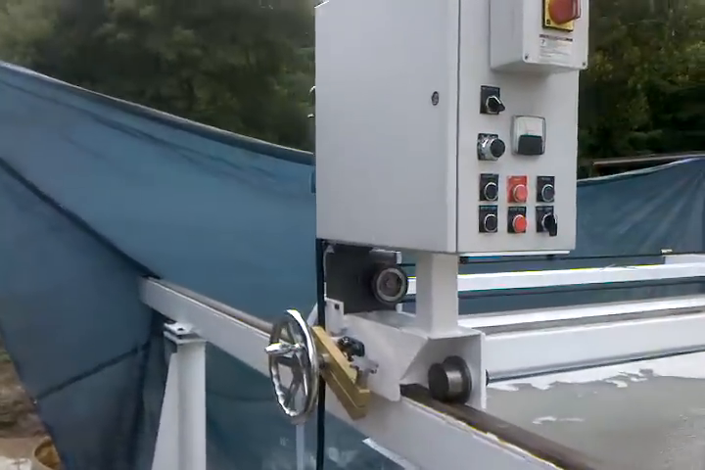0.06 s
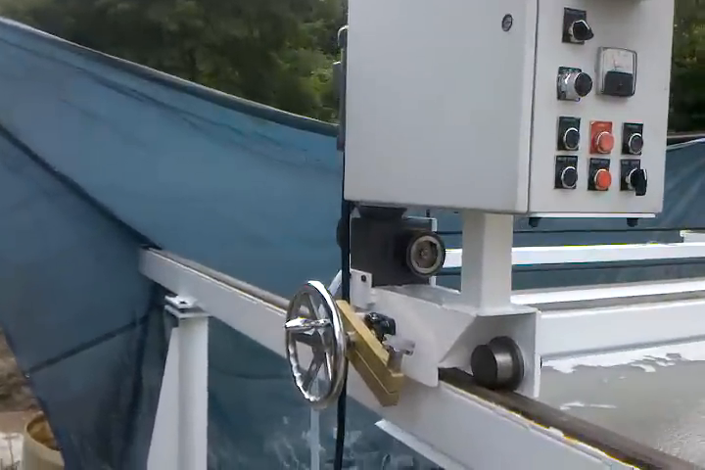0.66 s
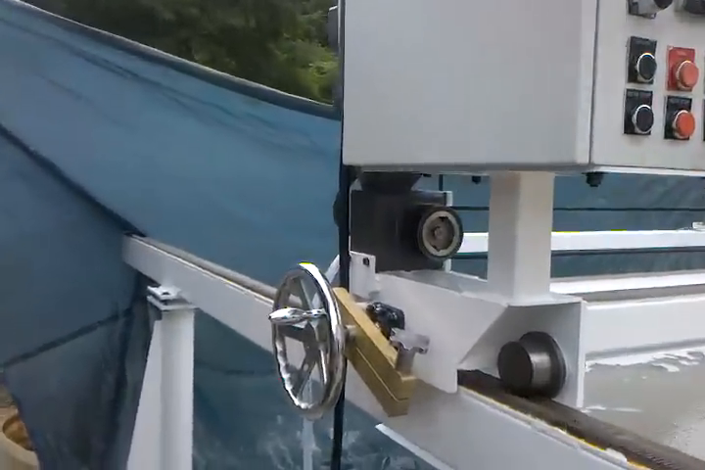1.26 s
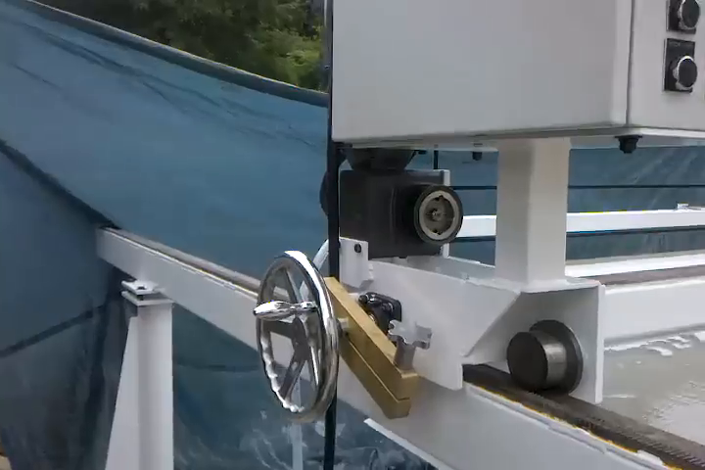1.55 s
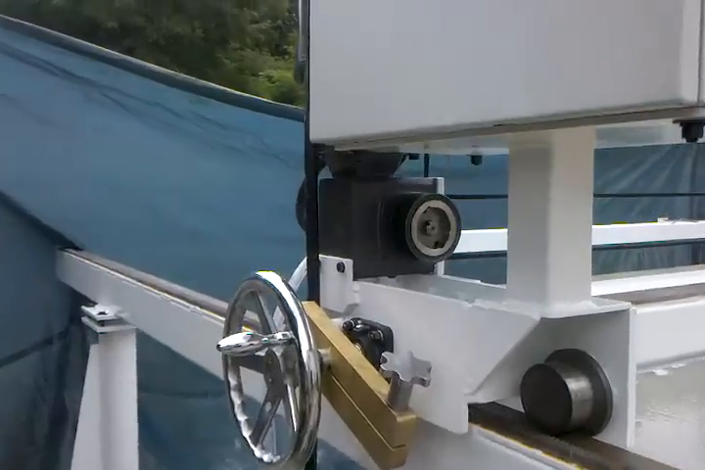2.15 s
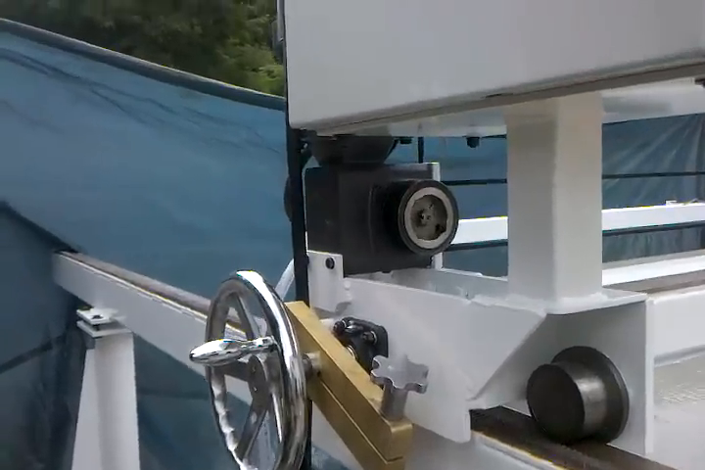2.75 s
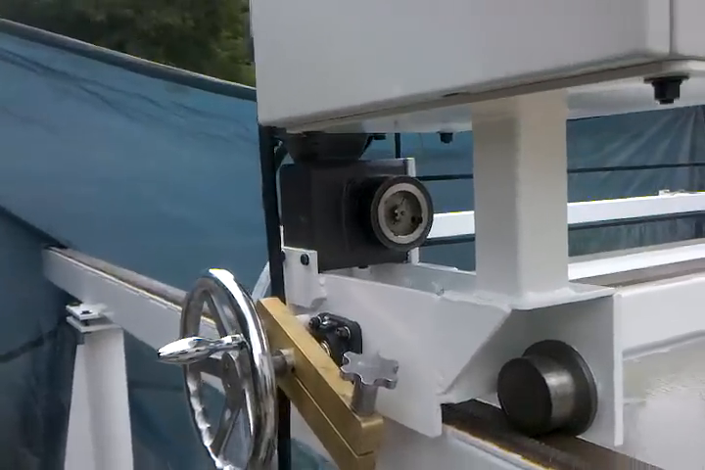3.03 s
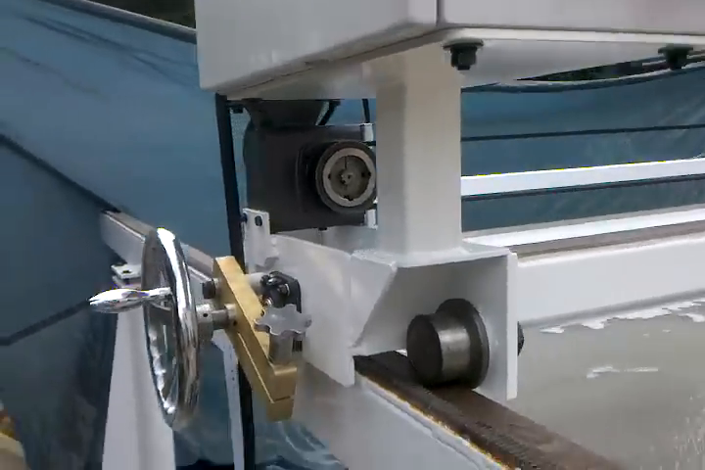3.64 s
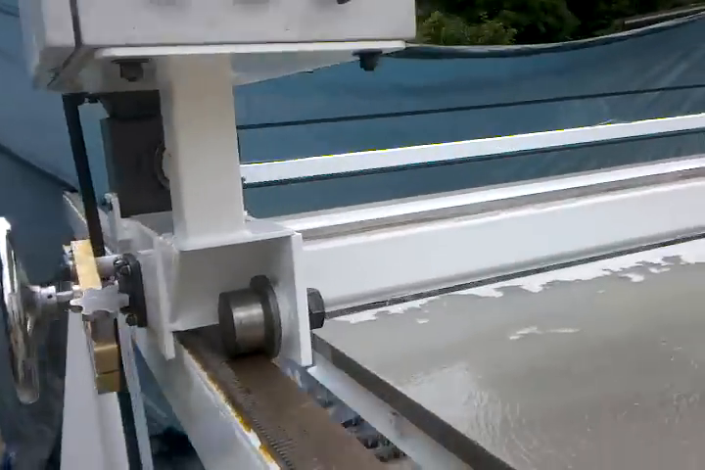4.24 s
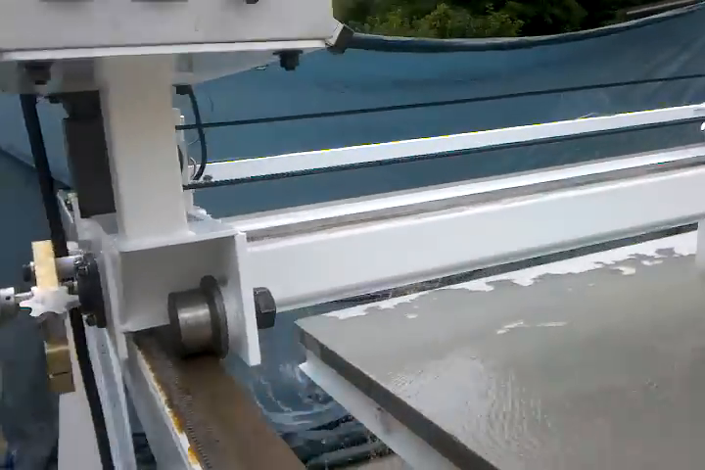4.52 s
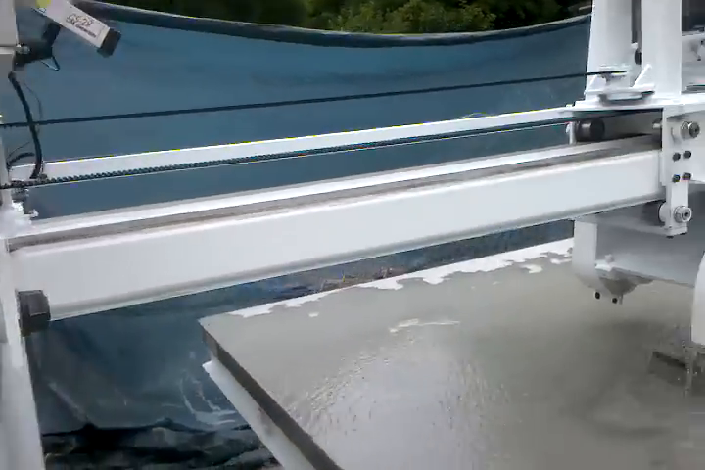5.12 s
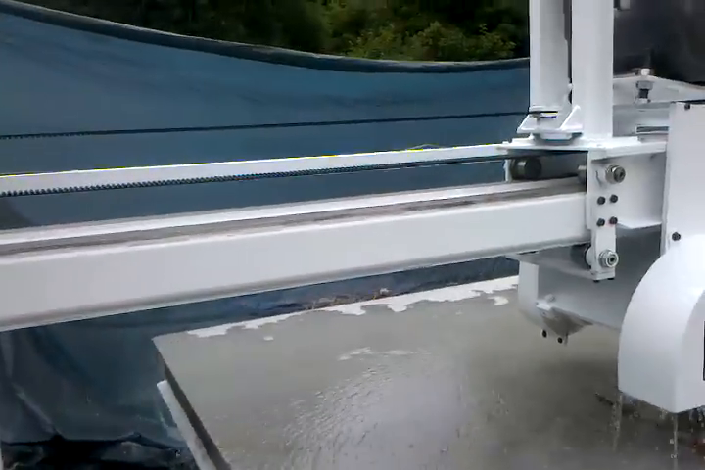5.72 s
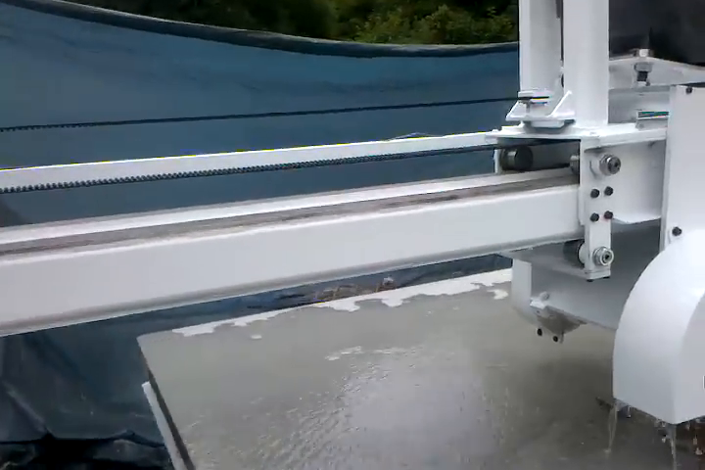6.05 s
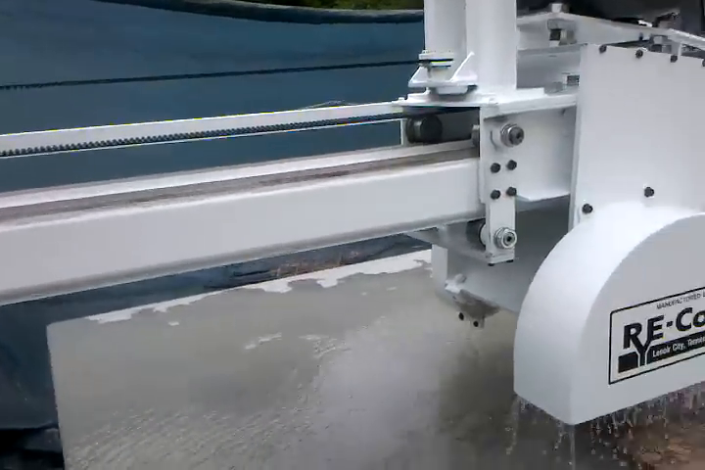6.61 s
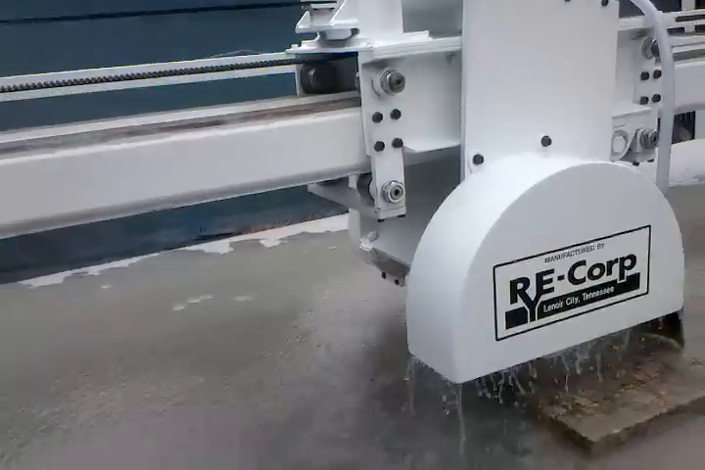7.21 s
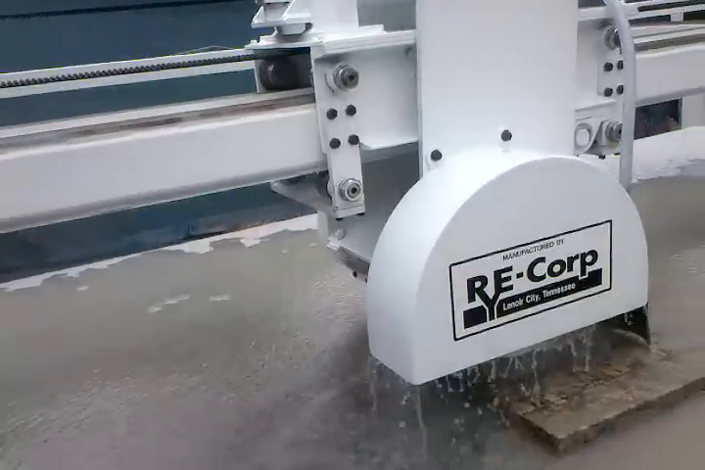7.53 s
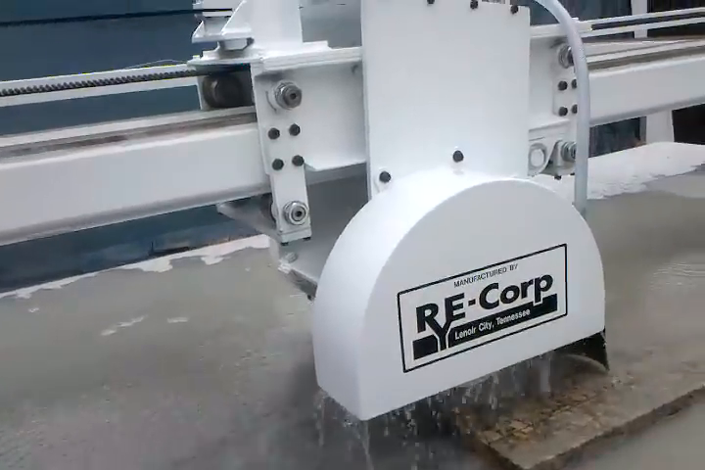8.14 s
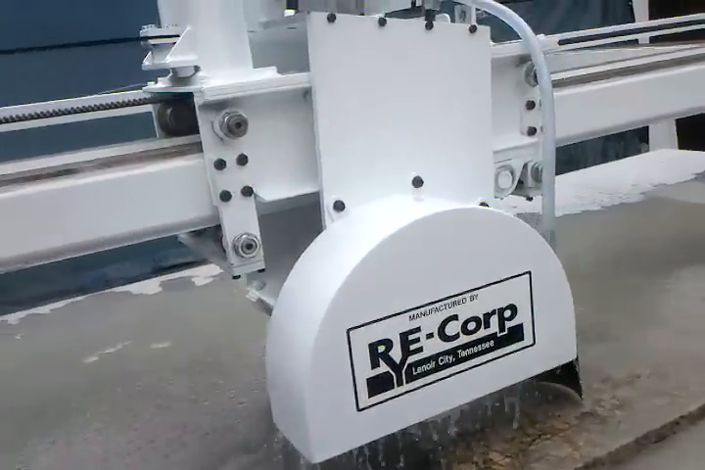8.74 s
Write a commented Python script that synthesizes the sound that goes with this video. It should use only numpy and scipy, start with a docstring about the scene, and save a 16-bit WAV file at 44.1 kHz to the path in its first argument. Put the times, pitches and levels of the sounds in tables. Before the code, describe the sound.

A large stone saw grinds through a wet slab, with ringing blade tones, squeals and hissing water, growing louder as it nears.

```python
"""Gantry saw in wet stone

A saw cuts a slab outdoors while the listener walks from the end carriage up to the blade guard.
The rim grinds much the same rough pattern at every turn, a 30 Hz buzz that rings in blade, guard and
frame. Blade tones swell and fade, the guard knocks, the motor hums, cooling water hisses and spatters."""
import sys
import numpy as np
from scipy import signal
from scipy.fft import rfft, irfft, next_fast_len
from scipy.io import wavfile
from scipy.ndimage import uniform_filter1d, map_coordinates

SR = 44100
rng = np.random.default_rng(int(sys.argv[2]) if len(sys.argv) > 2 else 0)


def transcribe(signal):
    """Save signal, clipped to [-1, 1], as a 16-bit WAV file at the path in sys.argv[1]."""
    frames = np.atleast_2d(signal).T
    limited = np.clip(frames, -1, 1)
    pcm = np.round(limited * 32767).astype(np.int16)
    wavfile.write(sys.argv[1], SR, pcm)


N = 391166
TIME = np.arange(N) / SR

# Spindle speed. Each row: time in seconds, turns per minute.
SPINDLE_RPM = [(0, 1787.3), (6.3, 1786.9), (6.6, 1786), (7.25, 1791.6), (8.1, 1796.4), (8.87, 1797.4)]
# The bite of the cut. Each row: time in seconds, share of fresh grit, once-a-turn throb in dB.
BITE = [(0, 0.34, 0.5), (4, 0.39, -1.5), (6.5, 0.38, 0.95), (7.6, 0.44, -1.5), (7.9, 0.84, 2),
        (8.87, 0.61, -1.5)]
# The walk. Each row: time in seconds, place (0 or less at the carriage, 1 beam, 2 or more at the guard).
WALK = [(0, -1.32), (3.8, 0.5), (4.9, -0.66), (6.9, 1), (7.7, 4), (7.95, 3.2), (8.87, 1.2)]
# How far off the blade is. Each row: time in seconds, distance in metres.
DISTANCE = [(0, 2.77), (0.8, 3), (1.3, 3.51), (3.8, 3.13), (4.4, 2.1), (5.3, 1.45), (6.5, 1.26),
            (7.7, 1.21), (8.87, 1.07)]
# The guard masks the rim. Each row: time in seconds, share hidden from 0 to 1.
RIM_HIDDEN = [(6.6, 0.07), (7.1, 0.15), (7.8, 0.35), (8.0, 0.77), (8.87, 1)]
# The reflection off the slab. Each row: time in seconds, lag in milliseconds.
SLAB_BOUNCE = [(0, 1.86), (.75, 2.1), (1.9, 1.72), (2.5, 2.17), (3.3, 1.65), (3.8, 1.83), (4.6, 1.7),
               (5.1, 1.93), (5.7, 2.166), (6.7, 2.34), (7.45, 1.68), (8.87, 1.55)]

# Motor harmonics. Each row: turn order (multiple of the spindle speed), relative level in dB.
HUM_ORDERS = [(2, -31.5), (3, -16), (4, -17), (5, -12), (6, 6.5), (7, 0.5), (8, 7), (9, -2), (10, -8)]
# Fader for the hum. Each row: time in seconds, level in dB.
HUM_LEVEL = [(0, -40), (1.2, -38.5), (3, -41), (4.8, -44.5), (6, -51), (8.87, -50)]
# Colour of the frame's rumble. Each row: frequency in Hz, relative level in dB.
RUMBLE_EQ = [(20, -62), (40, -42), (62, -10.5), (90, -9.5), (125, 8.5), (190, 6), (260, 13), (400, 9.5),
             (800, -27.5)]
# Fader for the rumble. Each row: time in seconds, level in dB.
RUMBLE_LEVEL = [(0, -43.5), (4, -45), (5.3, -41), (7.5, -43.5), (8.87, -42.5)]
# Colour of the wet rim's hiss. Each row: frequency in Hz, relative level in dB.
HISS_EQ = [(1500, -36.5), (2700, -12), (3300, -4), (4200, -1.5), (4700, 0.5), (5150, 4), (5600, 2),
           (6000, 2.5), (6400, 0), (6850, -1), (7200, -11), (7600, -22.5), (8300, -32), (9100, -50)]
# Fader for the hiss. Each row: time in seconds, level in dB.
HISS_LEVEL = [(0.0, -27), (0.39, -28), (0.74, -28), (1.45, -29.5), (3.9, -29), (5.39, -24.5), (5.56, -23),
              (6.35, -23.5), (6.65, -22), (7.76, -23.5), (7.98, -27), (8.87, -28)]
# The ring of the knocking guard. Each row: frequency in Hz, width in Hz, relative level in dB.
GUARD_MODES = [(914, 18, -4.5), (952, 28, -2.5), (1062, 27, -3)]
# Fader for the knock. Each row: time in seconds, level in dB.
KNOCK_LEVEL = [(0, -70), (4, -39), (6.5, -32.5), (7.6, -35), (7.85, -25.5), (8.1, -27.5), (8.35, -25.5),
               (8.87, -28.5)]

# Squeals of the binding rim. Each row: peak time in seconds, pitch in Hz, fade in seconds, level in dB.
SQUEALS = [(0.567, 2040, 0.38, -33.5), (.7, 4900, 0.36, -43), (0.755, 5520, 0.47, -32.5),
           (.95, 2400, 0.65, -32.5), (1.24, 6390, 0.17, -38), (1.75, 2250, 0.4, -35),
           (2.508, 2330, 0.44, -33), (2.83, 2105, 0.6, -36.5), (3.55, 5080, 0.14, -37),
           (3.59, 2050, 0.57, -32.5), (4.1, 2580, 0.13, -29), (4.53, 5090, 0.35, -33),
           (5.041, 2010, 0.5, -30.5), (5.132, 5000, 0.34, -36), (5.302, 2320, 0.12, -23),
           (5.75, 5060, 0.76, -29), (5.881, 2870, 0.43, -32), (5.97, 1510, 0.4, -29),
           (6.15, 2240, .15, -28), (6.03, 2015, 0.33, -25), (6.432, 2260, 0.13, -22.5),
           (6.47, 1880, 0.17, -24), (6.753, 5840, 0.62, -27.5), (6.76, 2280, 0.14, -23.5),
           (7.5, 1407, 0.92, -29.5), (7.55, 694, 0.58, -27), (7.833, 2050, 0.18, -22.5),
           (8.3, 2400, .35, -28.5)]
# Fader for the blade's lead tone. Each row: time in seconds, level in dB.
LEAD_LEVEL = [(0.0, -37), (0.39, -32.5), (0.94, -35.5), (1.23, -47), (1.98, -33), (2.74, -50),
              (3.51, -35.5), (4.2, -35.5), (4.45, -31.5), (5.41, -37), (6.2, -26.5), (6.67, -28),
              (6.89, -36), (7.21, -22.5), (7.73, -27.5), (7.95, -39), (8.82, -40), (8.87, -46)]
# The blade's supporting tones. Each row: turn order, level in dB at 1 m with the rim in the open.
BLADE_TONES = [(13, -49.5), (15, -39.5), (16, -43.5), (19, -42), (20, -38), (22, -40), (24, -34.5),
               (28, -36.5), (29, -39), (30, -41.5), (33, -33.5), (34, -38.5), (35, -37), (36, -35.5),
               (44, -36), (62, -37), (63, -41.5), (73, -33.5), (74, -45.5), (75, -35.5), (77, -34.5)]
# A tone sings out. Each row: start and end in seconds, turn order, level of the added tone in dB.
SINGS = [(.3, 1.45, 73, -34), (.5, .9, 74, -40), (1.4, 2.3, 29, -54), (1.45, 2.35, 44, -41.5),
         (1.5, 2.3, 34, -42), (2.5, 3.05, 74, -31.5), (2.9, 3.3, 73, -36.5), (3.25, 3.9, 34, -41),
         (4.1, 4.8, 36, -39), (4.2, 4.95, 34, -33), (4.6, 5.0, 44, -38), (5.1, 6.9, 73, -33.5),
         (5.2, 6.4, 34, -34.5), (5.25, 6.9, 74, -50), (5.3, 5.75, 62, -33.5), (6.05, 6.6, 62, -35),
         (6.15, 6.7, 44, -43), (6.4, 7.8, 29, -42), (6.95, 7.55, 33, -27.5), (7.05, 7.8, 24, -34.5),
         (7.4, 7.75, 34, -42), (7.9, 9.0, 13, -40.5), (8.1, 8.75, 33, -39), (8.35, 9.0, 34, -31)]
# Resonances of blade, guard and frame. Each row: frequency in Hz, width in Hz, then weight in dB
# within its register at the carriage, along the beam and at the guard.
STEEL_MODES = [(390, 30, 7.5, -15, 3), (460.7, 49, 18, 9.5, -7.5), (539, 130, -2, 7, -3.5),
               (660, 43, -7, -5.5, 2.5), (751, 110, -11, 13.5, -0.5), (805.3, 12, -3.5, -3.5, 2),
               (853, 50, -0.5, 0.5, -9.5), (994, 20, -9.5, 0, 32), (1043.4, 34, 0, -17, -17),
               (1069, 17, 1.5, -14.5, -33), (1274, 57, -4.5, -4, -5.5), (1354, 170, 7, -8.5, 2),
               (1490, 100, -1, 25, 0.5), (1704, 46, -9, -15, -18.5), (1847, 150, -19.5, -2, -22.5),
               (2062, 170, 6.5, -12.5, 0), (2297, 240, 4.5, 0, -10), (2458, 81, 0, -5.5, -6.5),
               (2628, 110, -2, -2, -6.5), (2870, 160, -22, -3.5, -19)]
# The five registers of the grind. Each entry: a band edge in Hz.
REGISTER_EDGES_HZ = [310, 620, 900, 1180, 1750, 3200]
# The lower four. Each row: level in dB at 1 m, power of distance it falls by, dB lost behind the guard.
LOWER_REGISTERS = [(-36.5, 0.67, -2), (-27.5, 1.26, 5.5), (-28, 1.6, 3), (-27.5, 0.98, 6)]
# Fader for the top register, the blade's whine. Each row: time in seconds, level in dB before the trim.
WHINE_LEVEL = [(0.0, -28), (0.1, -28.5), (0.52, -27.5), (2.22, -29.5), (2.39, -26), (2.89, -25.5),
               (3.09, -29), (4.64, -24.5), (5.26, -19.5), (6.17, -19.5), (6.3, -21.5), (6.4, -19.5),
               (7.19, -21.5), (7.93, -22), (8.15, -25.5), (8.2, -22.5), (8.6, -26.5), (8.87, -25.5)]

WHINE_TRIM_DB = -1.38
LEAD_ORDER, SING_FADE_S = 25, 0.23
TONES_FALLOFF, TONES_SHADE_DB = 1.26, 8   # supporting tones: power of distance, loss behind the guard


def from_db(db):
    """Decibels to gain."""
    return np.exp(np.asarray(db) * (np.log(10) / 20))


def unit_rms(x):
    """Normalise to unit power."""
    return x / np.sqrt(np.mean(x ** 2) + 1e-20)


def levelled(x):
    """Ride the gain to unit power over a quarter second, leaving the fast flutter."""
    return x / np.sqrt(uniform_filter1d(x ** 2, SR // 4) + 1e-12)


def automation(rows):
    """One curve over time for each column after the first."""
    times, *columns = np.transpose(rows)
    return [np.interp(TIME, times, column) for column in columns]


def fader(rows):
    """Gain curve through points of seconds and dB."""
    return from_db(automation(rows)[0])


def drift(rate, count=4000):
    """Smooth random modulation of rms 1 that takes a new value `rate` times a second."""
    coarse = np.linspace(0, TIME[-1], count)
    wander = map_coordinates(rng.standard_normal(count), [coarse * rate], order=3, mode="wrap")
    return np.interp(TIME, coarse, unit_rms(wander))


def equalised(x, curve):
    """Shape a sound with an EQ curve of Hz and dB; rms 1."""
    hz, db = np.transpose(curve)
    size = next_fast_len(N)
    bins = np.maximum(np.fft.rfftfreq(size, 1 / SR), 1)
    gain = from_db(np.interp(np.log(bins), np.log(hz), db))
    return unit_rms(irfft(rfft(x, size) * gain, size)[:N])


def resonate(x, hz, width_hz):
    """Ring one resonance; rms 1."""
    r = np.exp(-np.pi * width_hz / SR)
    return unit_rms(signal.lfilter([1, 0, -1], [1, -2 * r * np.cos(2 * np.pi * hz / SR), r * r], x))


def band(x, low_hz, high_hz):
    """Gentle band-pass."""
    return signal.sosfilt(signal.butter(2, [low_hz, high_hz], "band", fs=SR, output="sos"), x)


def tone(turns, order, waver_rad, flutter_db):
    """A sine at a multiple of the spindle speed, wavering in phase and level."""
    phase = 2 * np.pi * (order * turns + rng.random()) + waver_rad * drift(11)
    return np.sqrt(2) * np.sin(phase) * from_db(flutter_db * drift(25))


def throb(turns, depth_db, peak_turn):
    """The blade runs slightly out of true and presses harder once a turn; mean power 1."""
    return levelled(from_db(depth_db * np.cos(2 * np.pi * (turns - peak_turn))))


def slab_bounce(x, strength):
    """The wet slab mirrors the sound: a comb filter that slides as the listener moves."""
    lag_ms, = automation(SLAB_BOUNCE)
    return unit_rms(x + strength * np.interp(TIME - lag_ms / 1000, TIME, x))


def motor(turns):
    """The bed: the motor hums on low turn orders over the rumble of the frame."""
    hum = sum(from_db(db) * tone(turns, order, waver_rad=.15, flutter_db=1.1) for order, db in HUM_ORDERS)
    rumble = equalised(rng.standard_normal(N), RUMBLE_EQ)
    return fader(HUM_LEVEL) * unit_rms(hum) + fader(RUMBLE_LEVEL) * rumble


def spatter(per_s):
    """Drops flung from the blade tick on the stone, a few much harder than the rest."""
    return unit_rms(rng.laplace(size=N) * (rng.random(N) < per_s / SR))


def wet_hiss(grit, turns, throb_db, hidden):
    """Fine grit and spray pulse with the blade; the guard shades the lower treble."""
    spray = grit + from_db(-12) * spatter(per_s=600)
    gush = from_db(.5 * drift(14))
    pulse = throb(turns, 1.42 + 0.21 * throb_db, peak_turn=0.17)
    hiss = equalised(spray * gush * pulse, HISS_EQ)
    shaded = hiss - (0.1 + 0.28 * hidden) * band(hiss, 3580, 5500)
    return fader(HISS_LEVEL) * unit_rms(shaded)


def knocking_guard(turns, at_turn, uneven_db):
    """One push a turn, each a little early or late and of its own strength, rings the sheet-metal guard."""
    passed = np.floor(turns - at_turn + .035 * drift(25))
    pushes = np.diff(passed, append=passed[-1]) * from_db(-uneven_db * drift(32))
    ring = sum(from_db(db) * resonate(pushes, hz, width) for hz, width, db in GUARD_MODES)
    return fader(KNOCK_LEVEL) * unit_rms(band(ring, 896, 1165))


def squeals(force, turns, q):
    """The rim binds and throbs harder, and its grinding swells through one narrow resonance."""
    binding = force * throb(turns, depth_db=1.5, peak_turn=.07)
    out = np.zeros(N)
    for peak_s, hz, fade_s, db in SQUEALS:
        span = np.abs(TIME - peak_s) < fade_s
        width = hz / q
        ring = resonate(band(binding[span], hz - 2 * width, hz + 2 * width), hz, width)
        swell = np.cos(np.pi / 2 * (TIME[span] - peak_s) / fade_s) ** 2
        out[span] += from_db(db) * swell * ring
    return out


def singing_blade(turns, nearness, hidden, fading_db):
    """Turn orders that meet a mode of the disc sing: one leads, the rest grow up close and swell at times."""
    reach = nearness ** TONES_FALLOFF * from_db(-TONES_SHADE_DB * hidden)
    gains = {LEAD_ORDER: fader(LEAD_LEVEL)}
    for order, db in BLADE_TONES:
        gains[order] = reach * from_db(db + fading_db * drift(3.06))
    for start, end, order, db in SINGS:
        envelope = np.clip(.5 + np.minimum(TIME - start, end - TIME) / SING_FADE_S, 0, 1)
        gains[order] += from_db(db) * envelope
    return sum(gain * tone(turns, order, waver_rad=.2, flutter_db=.9) for order, gain in gains.items())


def rim_roughness(turns, wear_s, lasting, size=4096, count=32):
    """The rim's texture loops once a turn; a share lasts, the rest wears into new patterns."""
    spectra = np.exp(2j * np.pi * rng.random((count, size // 2 + 1)))
    patterns = irfft(spectra * (np.arange(size // 2 + 1) < size // 12))
    spot = (turns % 1 * size).astype(int)
    age = TIME / wear_s
    old, new = [patterns[(age.astype(int) + step) % (count - 1), spot] for step in (0, 1)]
    crossfade = age % 1 * np.pi / 2
    worn = np.cos(crossfade) * old + np.sin(crossfade) * new
    return unit_rms(np.sqrt(lasting) * patterns[-1, spot] + np.sqrt(1 - lasting) * worn)


def grind(pattern, fresh):
    """The looping pattern, blended with grit that breaks away at random."""
    fresh = np.clip(fresh, 0, 1)
    return np.sqrt(1 - fresh) * pattern + np.sqrt(fresh) * rng.standard_normal(N)


def ringing_steel(grinds, nearness, hidden, fading_db):
    """Two independent grinding patterns ring alternate registers of the steel, so neighbouring bands
    do not cancel. Each mode swells and fades as one walks through its standing waves."""
    place, = automation(WALK)
    levels = [from_db(db - shade * hidden) * nearness ** falloff for db, falloff, shade in LOWER_REGISTERS]
    levels.append(fader(WHINE_LEVEL) * from_db(WHINE_TRIM_DB))
    out = 0
    for index, (low, high, level) in enumerate(zip(REGISTER_EDGES_HZ, REGISTER_EDGES_HZ[1:], levels)):
        ring = power = 0
        for hz, width, *place_db in STEEL_MODES:
            if low <= hz < high:
                gain = from_db(np.interp(place, [0, 1, 2], place_db) + fading_db * drift(4.8))
                ring += gain * resonate(grinds[index % 2], hz, width)
                power += gain ** 2
        out += level * levelled(band(ring / np.sqrt(power), low * 0.87, high * 1.1))
    return out


def scene():
    """The mono mix: ring, tones, knock, hiss and hum all lock to the turning spindle."""
    rpm, = automation(SPINDLE_RPM)
    turns = np.cumsum(rpm * (1 + .0009 * drift(12))) / (60 * SR)
    fresh, throb_db = automation(BITE)
    nearness = 1 / automation(DISTANCE)[0]
    hidden, = automation(RIM_HIDDEN)
    grind_a, grind_b, edge = [rim_roughness(turns, wear_s=0.5, lasting=0.46) for _ in range(3)]
    pressure = throb(turns, throb_db, peak_turn=0.11) * from_db(.5 * drift(12))
    grinds = [slab_bounce(grind(loop, fresh) * pressure, strength=.28) for loop in (grind_a, grind_b)]
    steel = ringing_steel(grinds, nearness, hidden, fading_db=2.0)
    swells = squeals(grind(edge, fresh + .3) * pressure, turns, q=22)
    tones = singing_blade(turns, nearness, hidden, fading_db=3.5)
    grit = slab_bounce(grind(edge, fresh + .25), strength=.2)
    hiss = wet_hiss(grit, turns, throb_db, hidden)
    knock = knocking_guard(turns, at_turn=0.023, uneven_db=1.5)
    return (steel + tones + swells + knock + hiss + motor(turns))[None]


def record(dry):
    """The small microphone loses the deep bass, and the top is cut steeply."""
    thin = signal.sosfilt(signal.butter(6, 52, "high", fs=SR, output="sos"), dry)
    return signal.sosfilt(signal.ellip(10, .1, 90, 8900, fs=SR, output="sos"), thin)


dry = scene()
out = record(dry)
transcribe(out)
```